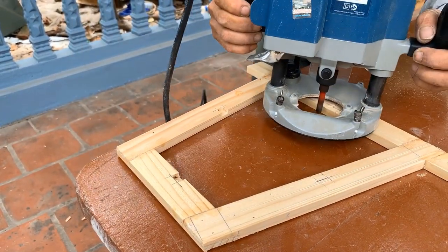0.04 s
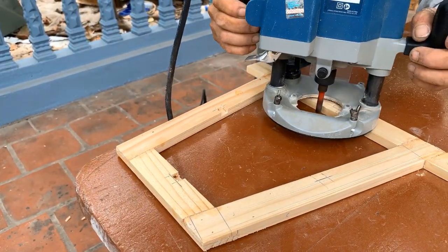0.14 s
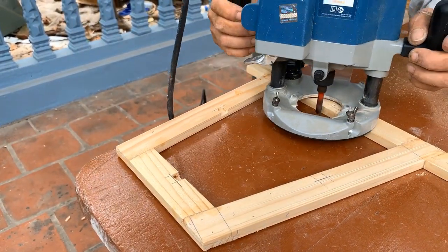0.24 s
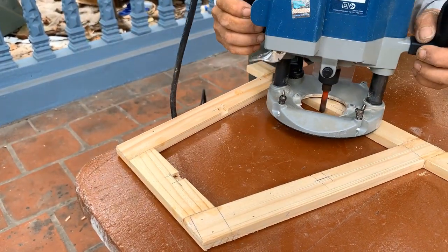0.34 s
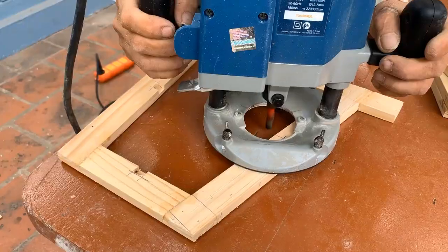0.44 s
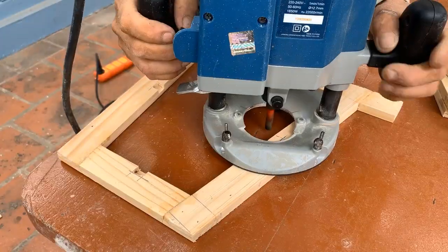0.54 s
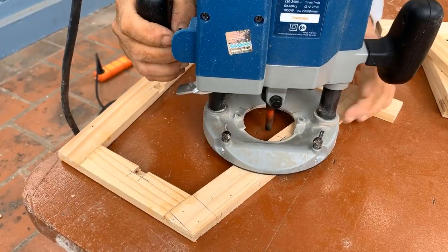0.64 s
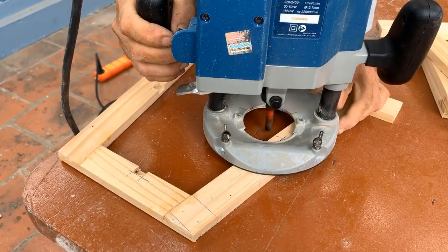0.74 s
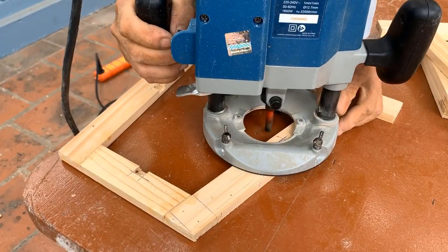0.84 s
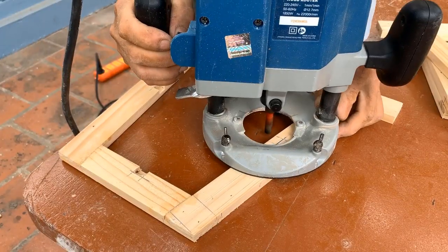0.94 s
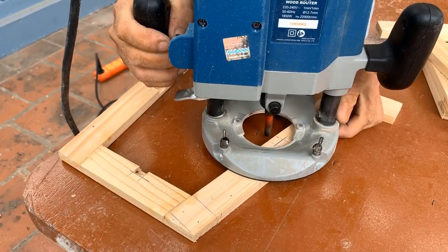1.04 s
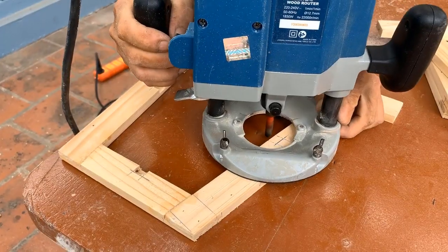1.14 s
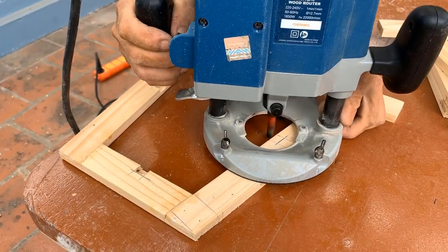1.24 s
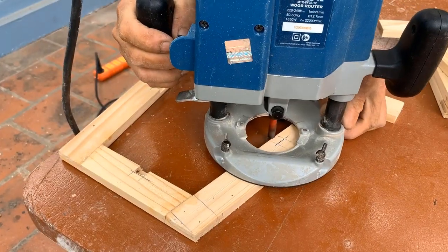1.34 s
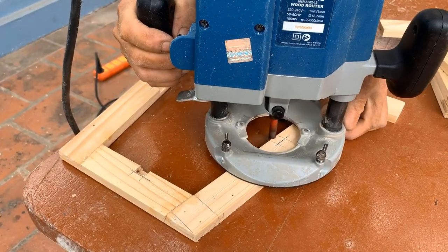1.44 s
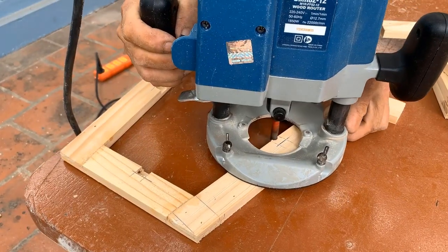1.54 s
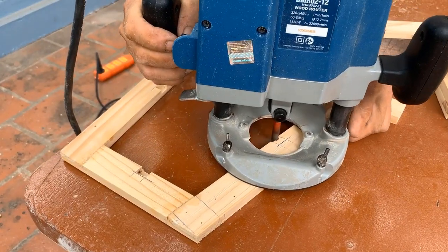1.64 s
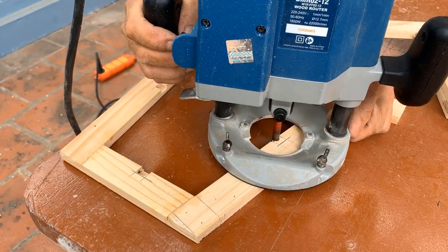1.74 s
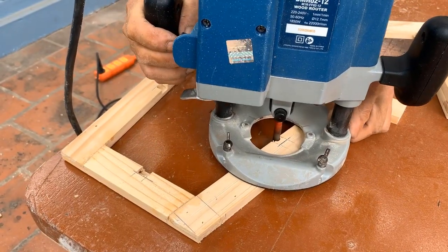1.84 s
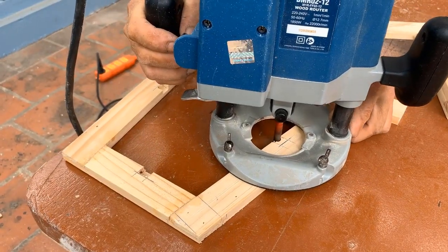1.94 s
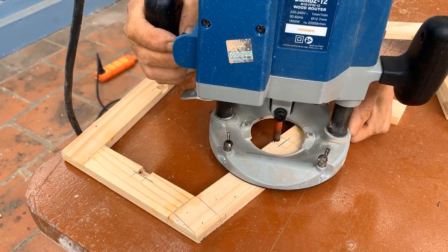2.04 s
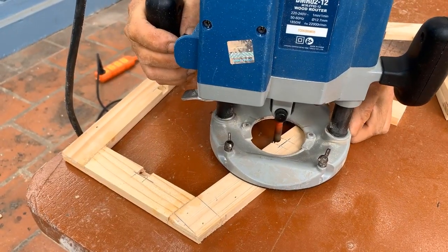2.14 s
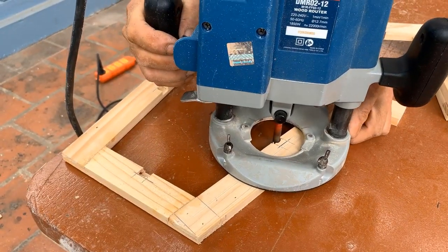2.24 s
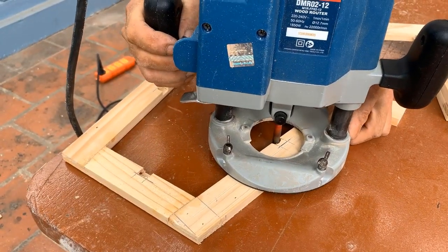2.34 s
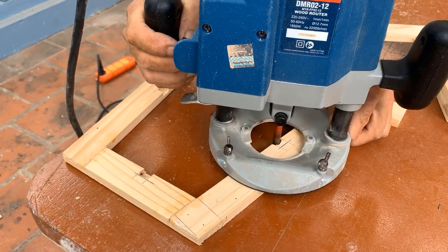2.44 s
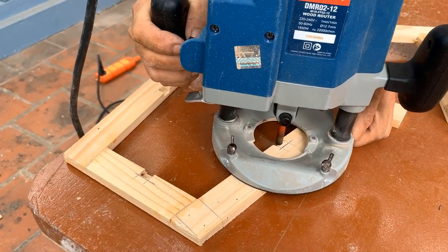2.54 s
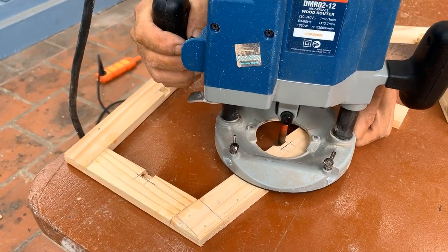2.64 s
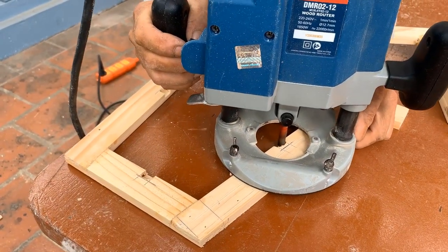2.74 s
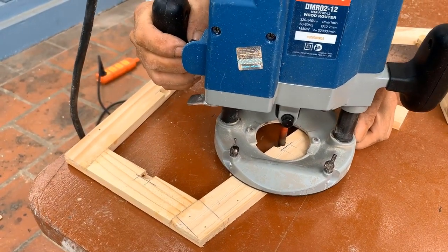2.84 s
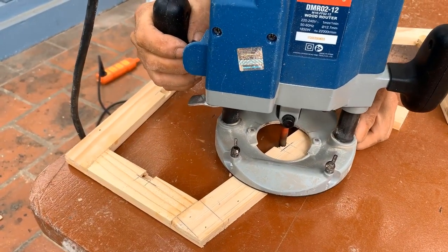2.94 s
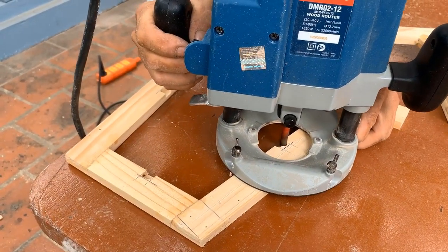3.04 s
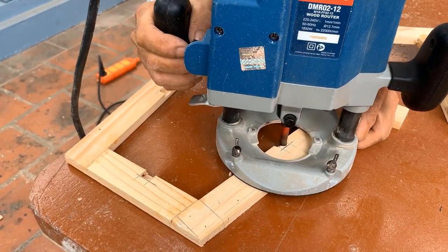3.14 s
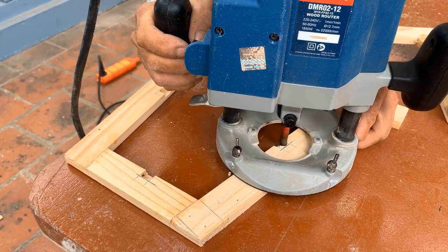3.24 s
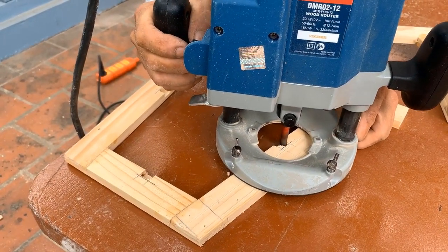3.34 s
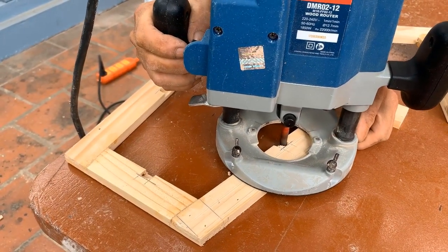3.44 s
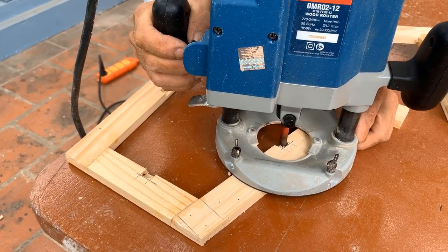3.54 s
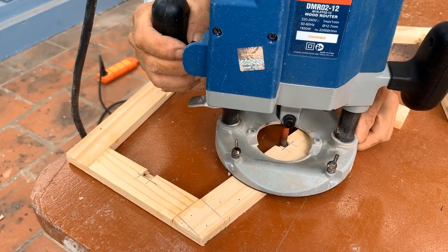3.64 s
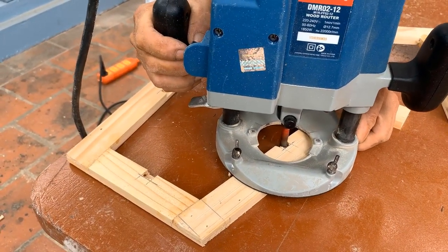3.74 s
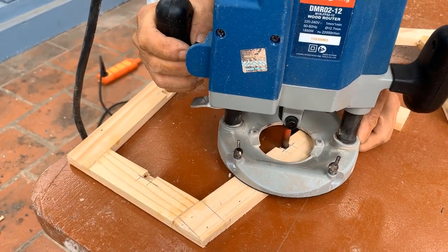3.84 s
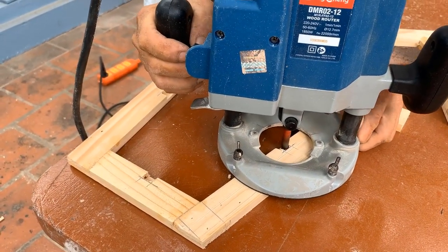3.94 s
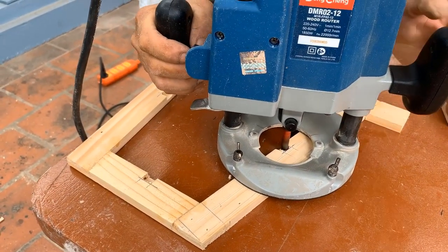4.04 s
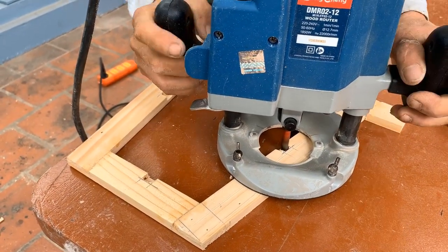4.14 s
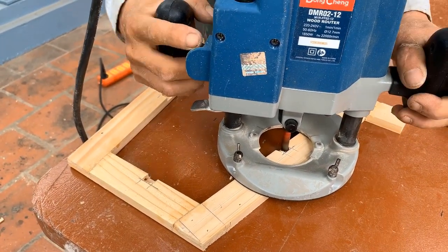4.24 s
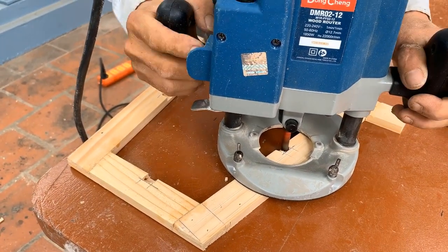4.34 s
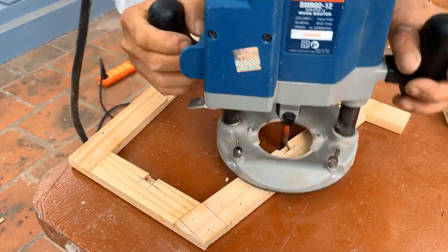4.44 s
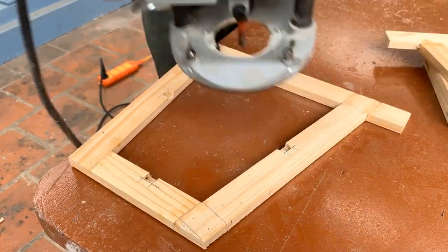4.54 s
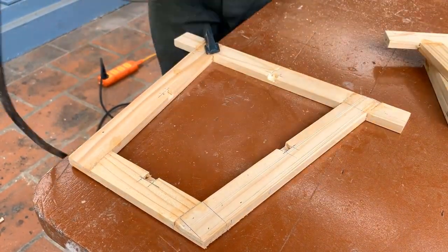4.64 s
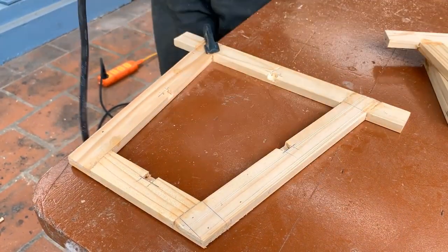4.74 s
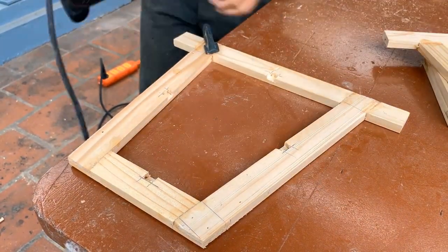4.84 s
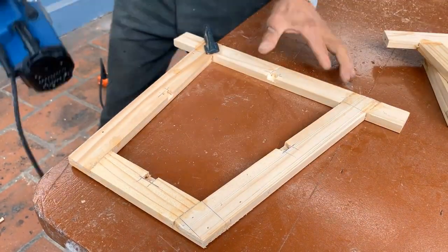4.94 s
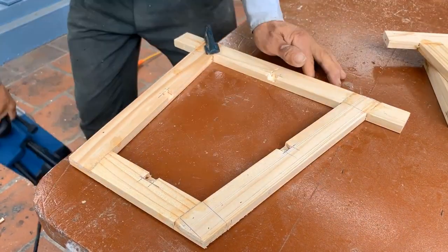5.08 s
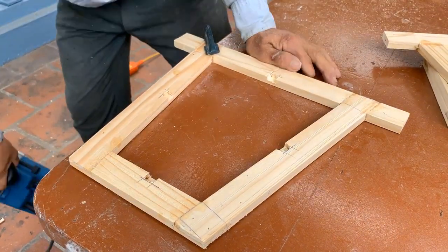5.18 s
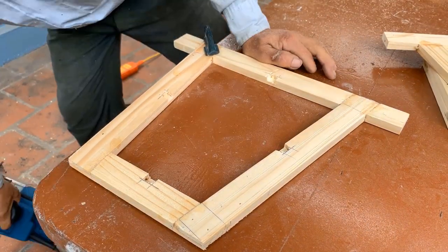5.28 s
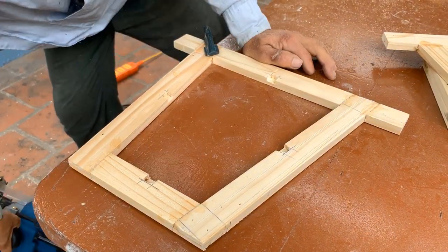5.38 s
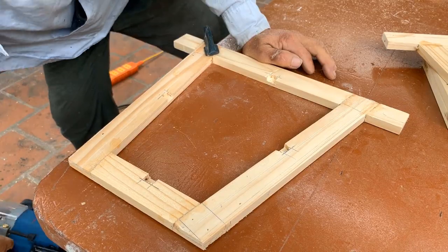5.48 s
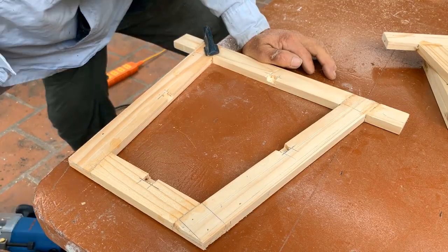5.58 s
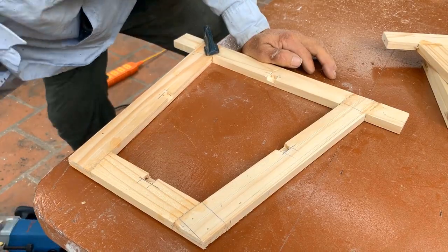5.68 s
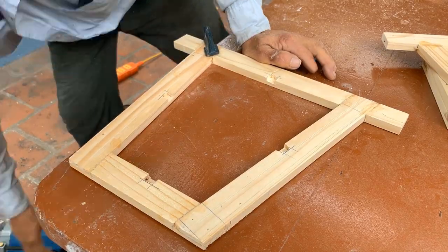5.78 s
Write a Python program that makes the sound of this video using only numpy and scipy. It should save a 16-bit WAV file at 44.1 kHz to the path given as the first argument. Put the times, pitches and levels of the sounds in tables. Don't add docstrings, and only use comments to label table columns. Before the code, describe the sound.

Close stereo pickup on an open tiled porch: a handheld router runs free with rushing fan air and motor hum, blinks silent for an instant at half a second, then bites softwood with wavering, shrill squeals. After about 4.4 seconds it is switched off, fades leftward with a descending whine, and lands in dull knocks, one a harder plastic click.

```python
import sys
import numpy as np
from scipy import signal
from scipy.fft import rfft, irfft, next_fast_len
from scipy.io import wavfile
from scipy.ndimage import uniform_filter1d, map_coordinates

SR = 44100
rng = np.random.default_rng(int(sys.argv[2]) if len(sys.argv) > 2 else 0)


def store_wav(level_fs):
    pcm = np.round(np.clip(np.atleast_2d(level_fs), -1, 1) * 32767)
    wavfile.write(sys.argv[1], SR, pcm.T.astype(np.int16))


def rack_gain(trim_db):
    fader = np.asarray(trim_db, float)
    return 10 ** (fader / 20)


N = 256215

SCENE_CHANGE_S, FIRST_CUT_S, SWITCH_OFF_S = .53, 1.408, 4.41
TOP_HZ = 15680
# (time [s], edge rate = twice shaft speed [Hz], hum level [dB])
SPEED = [(0.0, 883, -69), (0.04, 886.9, -60.5), (0.32, 888.6, -67), (0.78, 880, -59), (1.11, 882.7, -62.5),
         (1.53, 880.7, -57), (1.81, 862.5, -61.5), (2.06, 863.6, -54), (2.3, 869, -60), (2.57, 873.5, -55),
         (2.63, 874, -69), (2.73, 865.8, -61.5), (3.54, 862.6, -54.5), (3.61, 862.8, -58), (3.85, 870, -55),
         (3.92, 872.2, -65), (3.95, 873, -56.5), (4.4, 883, -57)]
# (time [s], share of the far colour [0-1])
AWAY = [
    (4.66, 0.03),
    (4.9, 0.97),
]


def unit(x):
    return x / np.sqrt(np.mean(x ** 2) + 1e-20)


def along(points, hz):
    f, v = np.transpose(points)
    return np.interp(np.log(hz + 1), np.log(f + 1), v)


def curves(rows):
    s, *cols = np.transpose(rows)
    return [np.interp(np.arange(N) / SR, s, c) for c in cols]


def wobble(rate):
    coarse = np.arange(0, N + 64, 64)
    knots = rng.standard_normal(int(N * rate / SR) + 4)
    smooth = map_coordinates(knots, [coarse * rate / SR])
    return np.interp(np.arange(N), coarse, smooth)


def filtered(x, response):
    m = next_fast_len(N + SR // 2)
    return irfft(rfft(x, m) * response(np.fft.rfftfreq(m, 1 / SR)), m)[..., :N]


def porch(x):
    t60 = 0.18
    t = np.arange(SR // 3) / SR
    tail = uniform_filter1d(rng.standard_normal((2, len(t))), 6, 1) * rack_gain(-60 * t / t60)
    delayed = np.pad(x, (300, 0))[None]
    return signal.fftconvolve(delayed, tail / np.linalg.norm(tail[0]), axes=1)[:, :N]


def knocks():
    # (time [s], peak level [dB], pitch [Hz], t60 [s], brightness [dB])
    landings = [
        (5.468, -55.5, 750, 0.043, -30),
        (5.565, -54.5, 750, .07, -30),
        (5.580, -57, 500, 0.051, -30),
        (5.597, -63, 600, .02, -30),
        (5.7316, -44.5, 900, 0.032, -0.5),
        (5.735, -54, 550, .05, -20),
        (5.749, -58, 453, 0.045, -30),
    ]
    out, t = np.zeros(N + SR), np.arange(SR // 4) / SR
    for s, db, hz, t60, bright_db in landings:
        thud = np.sin(2 * np.pi * hz * (0.202 * t + 0.00322 * (1 - np.exp(-t / 0.0039))))
        plastic = np.sin(2 * np.pi * 2050 * t) + 1.0 * np.sin(2 * np.pi * 1100 * t)
        click = rack_gain(bright_db - 60 * t / 0.029) * plastic
        attack = 1 - np.exp(-t / .0013)
        out[round(s * SR):][:len(t)] += rack_gain(db + 2.5 - 60 * t / t60) * attack * (thud + click)
    return out[:N]


def housing(hz):
    # (centre [Hz], width [Hz], lift [dB])
    resonances = [(1081, 20, 3.5), (1533, 95, 4), (2644, 84, 4.5), (4430, 92, 4), (5880, 130, 3),
                  (9600, 69, -1), (15700, 160, 5)]
    return rack_gain(sum(db / (1 + (2 * (hz - centre) / width) ** 2) for centre, width, db in resonances))


def levels():
    # (time [s], level [dB])
    airflow = [(0, -40.5), (1.33, -41), (1.49, -38.5), (1.6, -40), (1.76, -39.5), (1.98, -41), (2.19, -40),
               (2.51, -40.5), (2.67, -39.5), (3.68, -40), (4.52, -40.5), (4.61, -42), (4.77, -49.5),
               (4.92, -54), (5.09, -56.5), (5.38, -60), (5.59, -62.5), (5.81, -61.5)]
    full_flow_db, casing_lag_s = -40.5, .04
    flow_db, = curves(airflow)
    change = flow_db - full_flow_db
    late = np.interp(np.arange(N) - casing_lag_s * SR, np.arange(N), change)
    early = np.arange(N) / SR < SCENE_CHANGE_S
    rumble_db = -69.5 + 0.44 * change
    casing_db = -48 + 0.7 * late
    air_db = flow_db + early * -2.5
    return rumble_db, casing_db, air_db


def rush(spectrum, alike, patchy_db):
    z = signal.stft(rng.standard_normal((2, N)), nperseg=512)[2]
    patches = rng.standard_normal(z.shape[1:])
    patches = uniform_filter1d(uniform_filter1d(patches, 3, 0), 10, 1)
    pair = signal.istft(z * rack_gain(patchy_db * unit(patches)), nperseg=512)[1][:, :N]

    def response(hz):
        turn = np.arccos(np.clip(along(alike, hz), -1, 1)) / 2
        return rack_gain(along(spectrum, hz)) * housing(hz) * [np.cos(turn), np.sin(turn)]

    mid, side = filtered(pair, response)
    return unit(np.array([mid + side, mid - side]))


def roar():
    # (frequency [Hz], level [dB])
    rumble_colour = [(18, -62), (30, -37.5), (134, -2.5), (314, -4.5), (431, 0), (481, -2.5), (575, 0),
                     (707, -6.5), (800, 1), (1040, -32), (1760, -120)]
    # (frequency [Hz], level [dB])
    casing_colours = [
        [(290, -36), (500, -18), (820, -6), (1010, -4.5), (1400, -0.5), (1650, -9.5), (1900, -6.5), (2140, -4),
         (5600, -4), (7280, -33), (12300, -120)],
        [(290, -33), (500, -15), (800, -14.5), (950, -9), (1450, -3), (1880, -11), (2350, -6.5), (3210, -6),
         (4400, -3.5), (5600, -4.5), (7280, -36), (12300, -120)],
        [(290, -57), (500, -29), (625, -19), (719, -21.5), (1230, -11), (1310, -4.5), (2080, -12.5), (2350, -7),
         (2870, -9.5), (4390, -7), (5600, -15), (7280, -47), (12300, -120)],
    ]
    # (frequency [Hz], level [dB])
    air_colours = [
        [(2940, -52), (5000, -10.5), (6410, -7.5), (6960, 0), (7510, -4.5), (7880, 0.5), (9360, -8.5),
         (10900, -6), (11900, -10.5), (14100, -5.5), (15700, -16.5)],
        [(2940, -39.5), (5000, -8.5), (5400, -10), (5880, -5.5), (6230, -5.5), (6990, -0.5), (9270, -7),
         (12000, -6), (13300, -4.5), (15700, -11.5)],
        [(2940, -40), (5000, -5), (5640, -8.5), (7510, -9.5), (9540, -7.5), (10400, -10), (11200, -13.5),
         (13900, -11), (15700, -15)],
    ]
    # (frequency [Hz], left-right likeness [-1 to 1])
    likeness = [
        [(100, .998), (600, .98), (850, .8), (1150, .95), (2000, .7), (2750, 0), (3250, .7), (4250, .4),
         (5500, -.2), (7500, .45), (9500, .3), (12000, -.2), (15000, 0)],
        [(100, .992), (600, .96), (1150, .8), (1900, .5), (2300, .87), (4200, .7), (4700, 0), (6300, -.1),
         (6800, .6), (8700, .75), (10500, .1), (12200, .1), (13000, .65), (15500, .15)],
        [(100, .99), (600, .97), (1150, .6), (1750, .55), (2300, .4), (3000, .15), (3700, .2), (5200, .15),
         (6700, .3), (8700, .2), (14500, .1)],
    ]
    far_lag = 7
    rumble_db, casing_db, air_db = levels()
    away = np.clip(curves(AWAY)[0], 0, 1)
    early = np.arange(N) / SR < SCENE_CHANGE_S

    def blend(colours, patchy_db):
        first, near, far = (rush(c, a, patchy_db) for c, a in zip(colours, likeness))
        far = np.array([far[0], np.roll(far[1], far_lag)])
        return early * first + ~early * np.sqrt(1 - away) * near + np.sqrt(away) * far

    gust = .5 * wobble(9) + 0.68 * wobble(23.01)
    air = rack_gain(air_db + 2.05 + gust + 0.22 * wobble(30)) * blend(air_colours, 0.98)
    casing = rack_gain(casing_db + 0.72 + .5 * gust) * blend(casing_colours, 1.2)
    rumble_gain = rack_gain(rumble_db + 2.5 + 1.3 * wobble(14) + 1.25 * wobble(5.2))
    rumble = rumble_gain * rush(rumble_colour, likeness[1], patchy_db=1.5)
    return air + casing + rumble


def edge_phase():
    coast_s, drag_hz = 1.84, 78
    powered = curves(SPEED)[0]
    since = np.maximum(np.arange(N) / SR - SWITCH_OFF_S, 0)
    hz = drag_hz + (powered - drag_hz) * np.exp(-since / coast_s)
    return 2 * np.pi * np.cumsum(hz * (1 + 0.000595 * wobble(40))) / SR, hz


def tone(phase, hz, overtone, db, shake_db, shake_rate):
    aim = {1: (-.2, .1, 0), 2: (-.7, .3, -2.), 3: (.1, .15, -.5), 4: (.5, .4, .7), 5: (0, .3, 0),
           6: (2.1, .25, 3.), 8: (.65, .5, 1.8), 10: (0, .25, 0), 12: (-1.2, .6, 0), 14: (-1., .5, -3.),
           16: (-.3, .6, 0), 32: (-.4, .6, -2.)}
    lead, drift, lean_db = aim.get(overtone, (0, .7, 0))
    ears = np.array([[.5], [-.5]])
    turn = lead + drift * wobble(5.01)
    gain = (overtone * hz < TOP_HZ) * np.sqrt(2) * rack_gain(db + shake_db * wobble(shake_rate))
    gain = gain / np.maximum(abs(np.cos(turn / 2)), .55)
    return gain * rack_gain(lean_db * ears) * np.sin(overtone * phase + turn * ears)


def coasting(hz):
    # (centre [Hz], width [Hz], level [dB])
    body = [(462, 20, -65.5), (500, 40, -82), (556, 50, -80), (630, 45, -68), (700, 70, -80),
            (790, 50, -67), (1320, 90, -64), (1420, 90, -66), (1530, 150, -60), (1700, 80, -66)]
    between = rack_gain(-91)
    return between + sum(rack_gain(db) / (1 + (2 * (hz - centre) / width) ** 2) ** 2 for centre, width, db in body)


def motor(phase, hz):
    second_hum = (-62, -66, -71)
    # (overtone, level against the casing noise [dB], change when away [dB])
    rotor_tones = [(3, -20, -8), (5, -20, -8)]
    # (frequency [Hz], level [dB])
    blades = [(7200, -79), (8500, -70), (10000, -65), (11200, -77), (14000, -74), (14500, -71),
              (15200, -69), (16000, -78)]
    blade_overtones = (16, 32)
    hum_holds_s, hum_dies_db_per_s = .11, 220
    t = np.arange(N) / SR
    away = np.clip(curves(AWAY)[0], 0, 1)
    casing_db = levels()[1]
    second_db = np.take(second_hum, 1 * (t > SCENE_CHANGE_S) + (t > FIRST_CUT_S))
    fade_db = hum_dies_db_per_s * np.maximum(t - SWITCH_OFF_S - hum_holds_s, 0)
    out = np.zeros((2, N))
    for k, db in enumerate((curves(SPEED)[1], second_db), 1):
        hum_gain = rack_gain(db - fade_db) + (t > SWITCH_OFF_S) * coasting(k * hz)
        out += hum_gain * tone(phase, hz, k, 0, shake_db=2.0, shake_rate=21)
    for k, db, far_db in rotor_tones:
        out += tone(phase, hz, k, casing_db + db + away * far_db, shake_db=3.5, shake_rate=15)
    for k in blade_overtones:
        out += tone(phase, hz, k, along(blades, k * hz), shake_db=4.0, shake_rate=60)
    return out


def bit(phase, hz):
    # (time [s], depth as level of overtone 4 [dB], shrillness as gain up to overtone 10 [dB])
    bite = [(1.41, -43.5, -3), (1.5, -54, 9), (1.64, -47.5, 1), (1.76, -52.5, 7), (2.04, -64.5, 9),
            (2.2, -52.5, 12), (2.36, -65, 12), (2.44, -53, -2), (2.52, -70, 13), (2.68, -45.5, 5.5),
            (2.84, -54, -4), (2.93, -49.5, 5), (3.06, -50, -10), (3.3, -56.5, -9), (3.47, -53.5, 0),
            (3.62, -60.5, 0), (3.9, -65, 16), (4.12, -75, 3)]
    bite_overtones = (4, 8, 10, 12, 14)
    bite_levels = (0, -10, -0.5, -15, -13)
    squeal_overtones = (2, 3, 5, 6, 8, 12, 21)
    # (time [s], level [dB], length [s])
    squeals = [
        [(1.48, -61, .08), (1.72, -55, .24), (2.73, -56, 0.13), (3.0, -56.5, 0.097), (3.25, -62, .3),
         (3.57, -62.5, .08)],
        [(1.44, -52, .06), (2.05, -62, 0.046), (2.665, -56, .06), (3.12, -64, .1), (4.6, -66, 0.17)],
        [(1.98, -60, .3), (2.2, -55, .09), (2.705, -47, .09), (3.8, -60, .08), (4.62, -59, .12)],
        [(1.43, -48, .03), (1.59, -53, .04), (1.68, -51, .13), (2.69, -44, .09), (3.44, -59, .14)],
        [(1.73, -53.5, .2), (2.0, -57, .32), (2.86, -55.5, .12), (3.33, -54, .22), (3.56, -58, .1)],
        [(2.7, -52, .07), (3.01, -52, .09), (3.57, -51, .09)],
        [(5.74, -73, .2)],
    ]
    t = np.arange(N) / SR
    cutting = (t > FIRST_CUT_S) & (t < bite[-1][0])
    depth_db, shrill_db = curves(bite)
    out = np.zeros((2, N))
    for k, db in zip(bite_overtones, bite_levels):
        tilt = min(np.log(k / 4) / np.log(10 / 4), 1)
        out += cutting * tone(phase, hz, k, depth_db + tilt * shrill_db + db, shake_db=1.7, shake_rate=45)
    for k, rows in zip(squeal_overtones, squeals):
        swell = np.zeros(N)
        for s, db, span in rows:
            near = slice(round((s - span) * SR), round((s + span) * SR))
            swell[near] += rack_gain(db - 6 * (2 * (t[near] - s) / span) ** 2)
        out += swell * tone(phase, hz, k, 0, shake_db=2.5, shake_rate=70)
    return out


def scene():
    phase, hz = edge_phase()
    bumps = knocks()
    return roar() + motor(phase, hz) + bit(phase, hz) + bumps + rack_gain(-19.5) * porch(bumps)


def low_pass(x):
    return signal.sosfilt(signal.butter(12, 16410, fs=SR, output="sos"), x)


def record(dry):
    # (frequency [Hz], left minus right [dB])
    lean = [(1000, -0.5), (4400, 0.6), (8000, -0.5), (14000, -4)]
    # (time [s], gain [dB], gain of the dull remnant [dB])
    mute = [
        (.5143, 0, -60),
        (.5150, -16, -6),
        (.5240, -36, -17),
        (.5255, -62, -28),
        (.5310, -55, -29),
        (.5335, -31, -32),
        (.5358, -15, -60),
        (.5364, -4, -60),
        (.5385, 0, -60),
    ]

    def microphones(hz):
        sides = rack_gain(along(lean, hz) * np.array([[.5], [-.5]]))
        treble_end = np.clip((TOP_HZ - hz) / 40, 0, 1)
        bass_cut = 1 + (55 / (hz + 1)) ** 3
        return sides * treble_end / bass_cut

    heard = filtered(dry, microphones)
    dull = filtered(heard, lambda hz: np.exp(-(np.log((hz + 1) / 2300) / .3) ** 2))
    gain_db, remnant_db = curves(mute)
    return low_pass(heard * rack_gain(gain_db) + dull * rack_gain(remnant_db))


dry = scene()
out = record(dry)
store_wav(out)
```